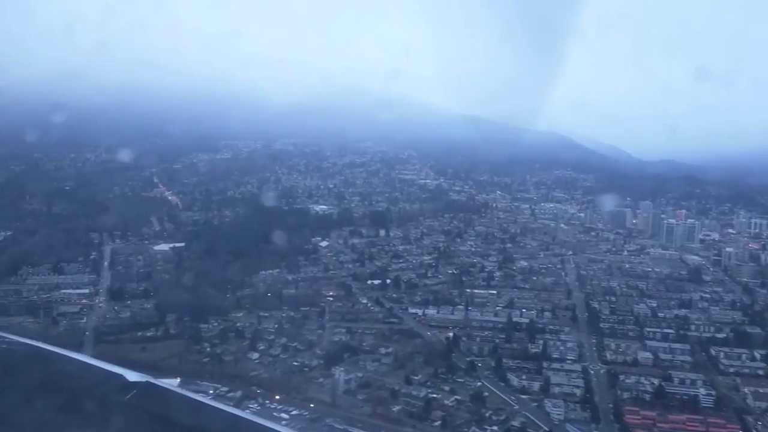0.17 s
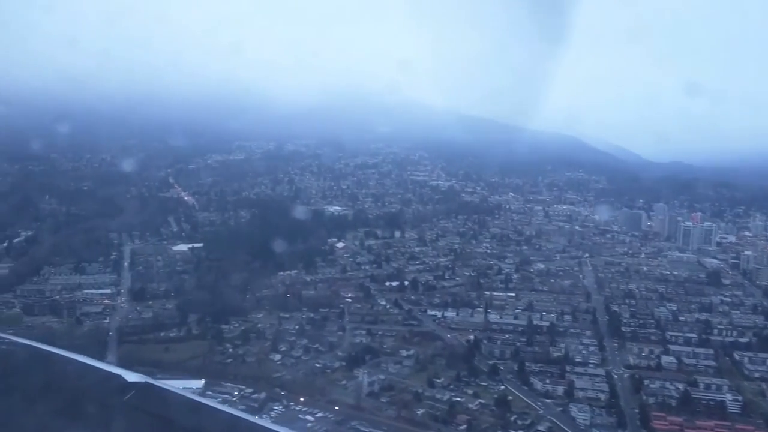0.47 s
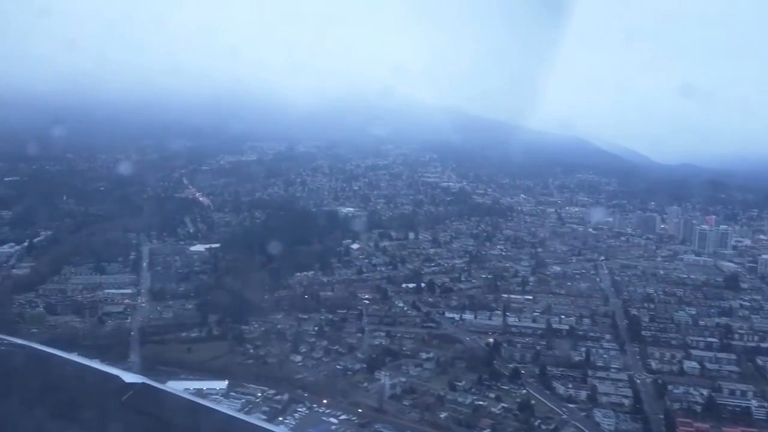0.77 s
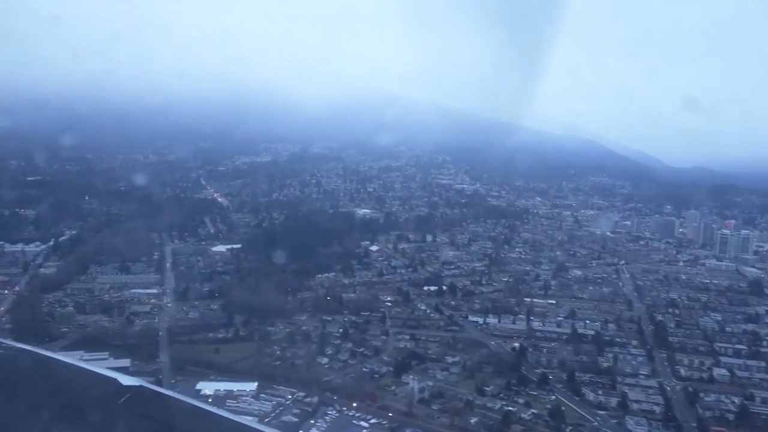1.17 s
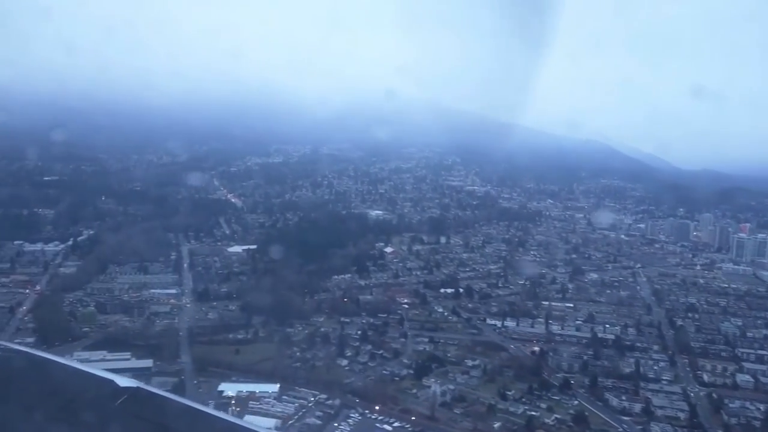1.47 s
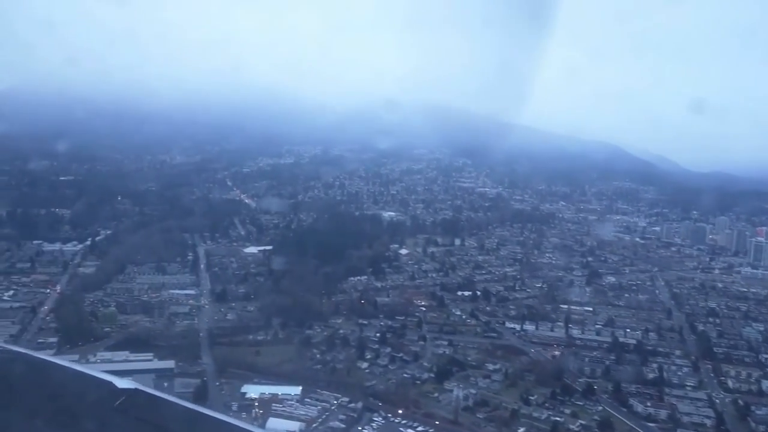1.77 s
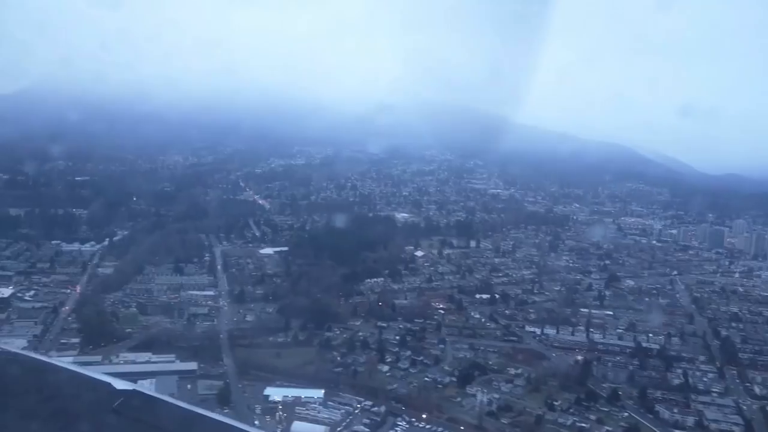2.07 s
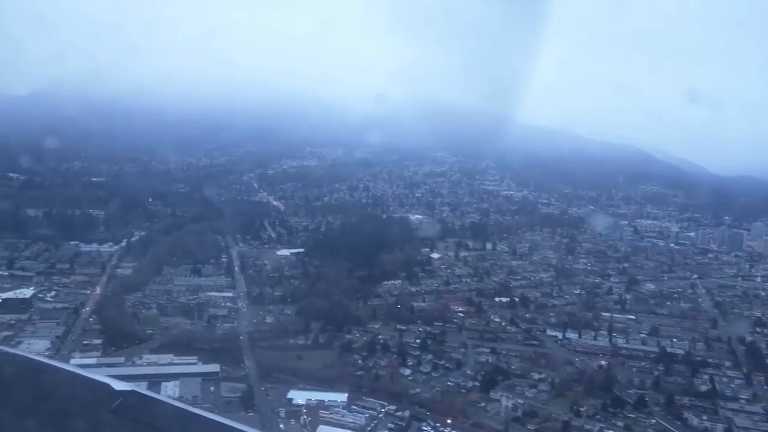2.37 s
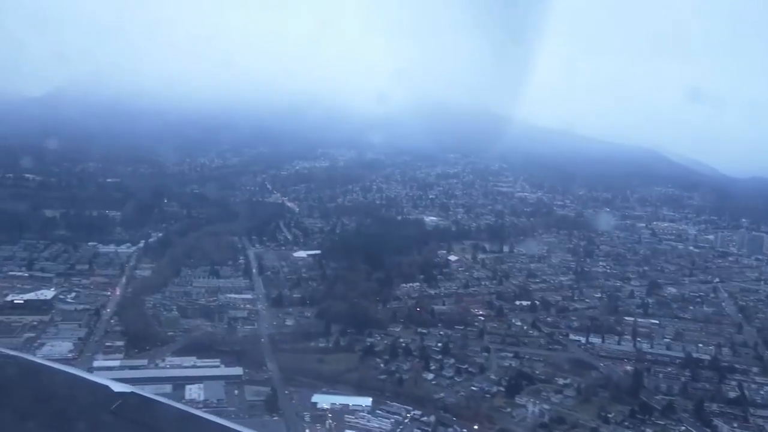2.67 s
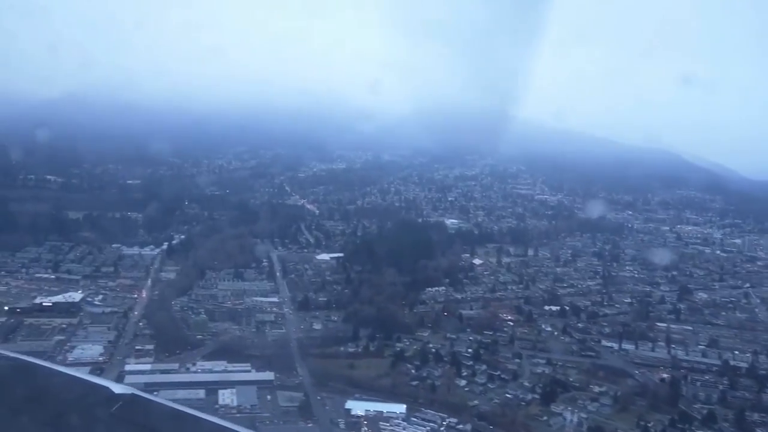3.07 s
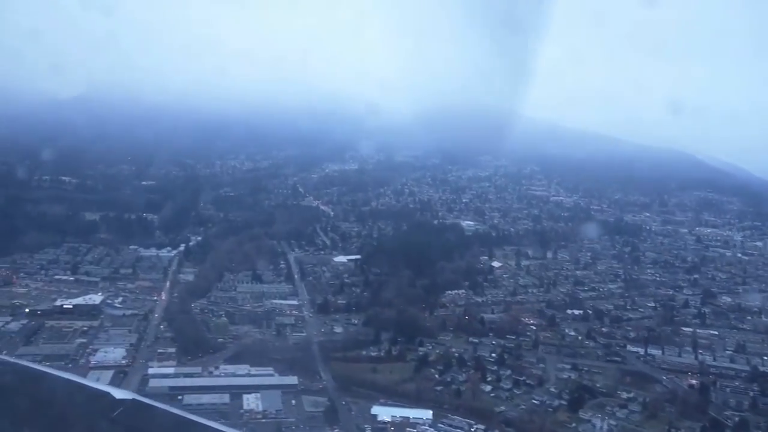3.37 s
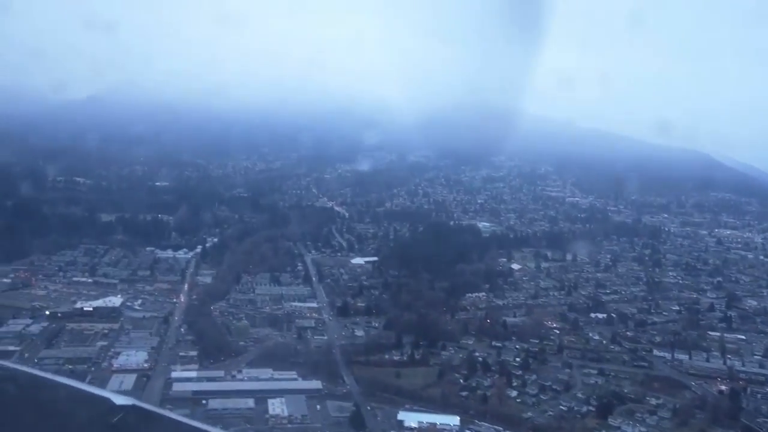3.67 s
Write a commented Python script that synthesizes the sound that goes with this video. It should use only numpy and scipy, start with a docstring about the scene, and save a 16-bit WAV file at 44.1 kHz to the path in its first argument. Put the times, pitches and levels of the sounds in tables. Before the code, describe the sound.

Deep turboprop drone hums continuously inside a small plane while the soft wind rush swells midway.

```python
"""A low drone fills the cabin of a small three-blade turboprop in cruise, under a rush of air that swells.
The drone is additive synthesis: the blade tone, its overtones and the propeller shaft orders.
The air is noise shaped by a spectrum; a gear tone and a fuzzy turbine whine sound faintly above.
The drone overloads the microphone on its downward swing at first, which flattens the troughs
and chops the hiss once a cycle."""
import sys
import numpy as np
from scipy import signal
from scipy.io import wavfile
from scipy.ndimage import uniform_filter1d

SR = 44100
rng = np.random.default_rng(int(sys.argv[2]) if len(sys.argv) > 2 else 0)


def wav_out(sig):
    """Save sig, one row per channel (or a flat mono array), as 16-bit PCM at SR to the path in sys.argv[1]."""
    wavfile.write(sys.argv[1], SR, np.round(np.clip(np.atleast_2d(sig).T, -1, 1) * 32767).astype(np.int16))


def gain_from_decibels(decibels):
    """Convert decibel values to linear amplitude factors."""
    exponent = np.asarray(decibels, float) / 20
    return 10 ** exponent


N = 168021
T = np.arange(N) / SR


def evened(x):
    """Normalization: scales a signal to unit rms."""
    return x / np.sqrt(np.mean(abs(x) ** 2) + 1e-20)


def curve(rows, col=1, at=T):
    """Linear interpolation: one column of a table at the given times."""
    rows = np.array(rows, float)
    return np.interp(at, rows[:, 0], rows[:, col])


def read(points, hz):
    """Logarithmic frequency axis: a spectrum table is interpolated along it."""
    f, value = np.transpose(points)
    return np.interp(np.log(hz + 1), np.log(f + 1), value)


def drift(hz):
    """Narrow-band modulation: complex noise of about hz bandwidth and unit rms."""
    r = np.exp(-np.pi * hz / SR)
    settle = SR  # the filter runs in for a second first
    z = rng.standard_normal(N + settle) + 1j * rng.standard_normal(N + settle)
    return evened(signal.lfilter([1], [1, -2 * r, r * r], z)[settle:])


def tone(turns, db):
    """Simple harmonic motion: a cosine of rms level db."""
    return np.sqrt(2) * gain_from_decibels(db) * np.cos(2 * np.pi * turns)


# Blade passing frequency. Each row: time in seconds, blade rate in Hz.
BLADE_RATE = [(0, 86.11), (1.8, 86.11), (2.0, 86.2), (2.4, 86.2), (2.8, 85.8), (3.1, 85.7), (3.4, 85.95),
              (3.81, 86.15)]
START_TURNS = .2  # the drone is met in mid-swing


def blade_turns():
    """Phase is the time integral of frequency: blade cycles elapsed."""
    return START_TURNS + np.cumsum(curve(BLADE_RATE)) / SR


WOBBLE_DB, WOBBLE_TURNS, WOBBLE_HZ = .08, .0012, 12  # level and phase wobble per order, bandwidth
# Blade orders 1 to 4. Each row: time in seconds, then the rms level in dB of orders 1, 2, 3 and 4.
ORDER_LEVELS = [(0, -9.5, -26.5, -39, -34), (.3, -9.5, -27, -37.5, -29), (.6, -9.5, -25, -33.5, -32),
                (.9, -10, -23.5, -34, -29.5), (1.2, -10.5, -21, -33.5, -31.5),
                (1.5, -11.5, -21, -32, -25.5), (1.75, -11, -20.5, -34.5, -38),
                (1.95, -12.5, -20.5, -41, -34), (2.08, -14, -24.5, -35, -27), (2.2, -14.5, -27.5, -25, -33),
                (2.33, -13, -21, -26, -26.5), (2.48, -12.5, -17, -39, -27), (2.7, -12.5, -17.5, -44, -26),
                (2.9, -15, -19, -31.5, -28), (3.05, -13, -22, -25.5, -31), (3.17, -11.5, -32.5, -23.5, -27),
                (3.3, -11.4, -22, -24.5, -27.5), (3.5, -11.5, -21.5, -31, -26.5),
                (3.81, -11, -21, -32, -26.5)]
# Push or pull of each order at the crest. One sign for each of orders 1 to 4.
ORDER_SIGNS = (1, -1, 1, 1)
# Drift of the orders from the blade beat across the cabin. Each row: time in seconds, then the lead
# in turns of orders 1, 2, 3 and 4.
ORDER_LEADS = [(0, 0, 0, 0, .05), (1.7, 0, 0, 0, .08), (1.9, .01, 0, 0, .2), (2.1, .04, 0, .24, .36),
               (2.3, .05, 0, -.05, .16), (2.5, .1, 0, -.12, .08), (2.75, .1, 0, -.2, .06),
               (2.9, .06, 0, -.24, .05), (3.1, 0, 0, -.08, .11), (3.3, .05, 0, .25, .38),
               (3.81, .05, 0, .29, .42)]


def blade_orders(turns):
    """Fourier series of the blade pressure: each harmonic wobbles more the higher it is."""
    out = np.zeros(N)
    for order, sign in enumerate(ORDER_SIGNS, 1):
        wobble = drift(WOBBLE_HZ) * order
        phase = order * turns + curve(ORDER_LEADS, col=order) + WOBBLE_TURNS * wobble.imag
        level = curve(ORDER_LEVELS, col=order) + WOBBLE_DB * wobble.real
        out += sign * tone(phase, level)
    return out


UPPER_LAG_S = 0.00025
# Higher blade harmonics. Each row: blade order, rms level in dB.
UPPER_ORDERS = [(5, -50.5), (6, -53), (7, -54.5)]


def upper_orders(turns):
    """Phase alignment: harmonics that crest together, half a turn and a short lag after the blade beat."""
    out = np.zeros(N)
    for order, db in UPPER_ORDERS:
        beat = turns + .5 - UPPER_LAG_S * curve(BLADE_RATE)
        out += tone(round(order) * (beat + WOBBLE_TURNS * drift(WOBBLE_HZ).imag), db)
    return out


CALM_DB = -48.5  # treble level that counts as no swell
# Strength of the airflow. Each row: time in seconds, treble level in dB.
AIR_LEVEL = [(0.05, -48.5), (0.18, -48), (0.21, -48), (0.9, -48), (1.0, -46.5), (1.01, -48.5),
             (2.13, -46.5), (2.27, -40), (2.72, -42), (3.13, -38.5), (3.77, -42.5)]


def air_swell(at=T):
    """Level difference: the treble of the airflow in dB above calm."""
    return curve(AIR_LEVEL, at=at) - CALM_DB


# Propeller shaft orders and gear mesh. Each row: order of the shaft rate, rms level in dB in calm air.
SHAFT_ORDERS = [(2, -48), (4, -46.5), (85, -69.5)]


def shaft_orders(turns):
    """Rotational orders: multiples of the shaft rate, unsteady in level, swelling with the air."""
    out = np.zeros(N)
    swell = air_swell()
    for order, db in SHAFT_ORDERS:
        unsteady = abs(1 + .5 * drift(6)) / np.sqrt(1.25)  # unit rms
        shaft_turns = turns / 3  # three blades a turn
        out += tone(round(order) * shaft_turns + rng.random(), db + swell) * unsteady
    return out


RUSH_DB, PATCH_DB, FLUTTER_DB = -32.5, 1, 0.1  # rms level in calm air, spectral patches, level flutter
# Spectrum of the rush and hull rumble. Each row: frequency in Hz, relative density in dB per Hz.
RUSH_SPECTRUM = [(12, -15), (28, -6.5), (42, -10), (56, -2.5), (80, -9.5), (115, -1.5), (150, -10),
                 (230, -7.5), (300, -8.5), (390, -9), (460, -15.5), (560, -23.5), (650, -20.5), (740, -27),
                 (830, -25), (950, -28.5), (1250, -32.5), (1450, -27), (1700, -33), (2000, -31.5),
                 (2350, -37.5), (3400, -38.5), (4400, -43), (5400, -39.5), (6900, -43.5), (7600, -38.5),
                 (8500, -39.5), (8850, -34.5), (9700, -33), (10300, -35), (11500, -37.5), (13000, -40),
                 (14500, -41), (16000, -40)]
# Narrow hiss around the whine. Each row: frequency in Hz, dB added to the rush.
HISS_RIDGE = [(8900, 0), (9060, 4.5), (9250, 5.5), (9360, 4), (9450, 1), (9700, 0)]
# Response to the swell. Each row: frequency in Hz, share of the swell followed.
SWELL_SHARE = [(30, 0.1), (150, 0.84), (600, 0.45), (1100, 0.47), (1500, 0.67), (9000, 0.7)]


def airflow():
    """Filtered noise: random short-time spectra, shaped and patchy, give the rush of air and hull rumble."""
    size, hop = 2048, 512
    frames, hz = N // hop + 5, np.fft.rfftfreq(size, 1 / SR)
    real, imag, patches = rng.standard_normal((frames, len(hz), 3)).T
    patches = uniform_filter1d(patches, size=16, axis=0)  # across frequency
    patches = evened(uniform_filter1d(patches, size=6, axis=1))  # across time
    shape = read(RUSH_SPECTRUM, hz) + read(HISS_RIDGE, hz)
    calm = (real + 1j * imag) * gain_from_decibels(shape[:, None] + PATCH_DB * patches)
    swell = air_swell(np.arange(frames) * hop / SR)
    swollen = calm * gain_from_decibels(read(SWELL_SHARE, hz)[:, None] * swell)
    calm_sound = signal.istft(calm, nperseg=size, noverlap=size - hop)[1]
    rush = signal.istft(swollen, nperseg=size, noverlap=size - hop)[1][:N]
    calm_rms = np.sqrt(np.mean(calm_sound ** 2))
    return gain_from_decibels(RUSH_DB + FLUTTER_DB * drift(36).real) * rush / calm_rms


WHINE_WIDTH_HZ, WHINE_FUZZ = 10, .35  # bandwidth and relative amplitude of the fuzz
# Turbine whine. Each row: time in seconds, whine frequency in Hz, then the rms level in dB before the
# fuzz of the whine, of the sideband one blade rate above and of the sideband one blade rate below.
WHINE = [(0, 9180, -74, -59, -76), (1.0, 9180, -72, -60, -76), (1.2, 9178, -70, -67, -76),
         (1.75, 9168, -68, -62, -74), (2.0, 9125, -62, -70, -64), (2.3, 9098, -57, -68, -63),
         (2.7, 9122, -60, -72, -68), (3.1, 9135, -59, -66, -57), (3.35, 9142, -68, -57, -57),
         (3.6, 9147, -72, -57, -59), (3.81, 9152, -72, -56, -66)]


def turbine(turns):
    """Modulation sidebands: a fuzzy whine with a line either side at the blade rate."""
    out = np.zeros(N)
    spin = np.exp(2j * np.pi * np.cumsum(curve(WHINE)) / SR)
    for col, side in ((2, 0), (3, 1), (4, -1)):
        line = spin * np.exp(2j * np.pi * side * turns)
        fuzz = 1 + WHINE_FUZZ * drift(WHINE_WIDTH_HZ)
        out += np.sqrt(2) * gain_from_decibels(curve(WHINE, col=col)) * (line * fuzz).real
    return out


def scene():
    """Superposition: all the cabin sounds add, sharing one blade phase."""
    turns = blade_turns()
    propeller = blade_orders(turns) + upper_orders(turns) + shaft_orders(turns)
    return (propeller + airflow() + turbine(turns))[None]


KNEE = .001  # softness of the floor, in amplitude
STICK, RECOVERY_S = 1.2, .0004  # how much of the overload lingers, and for how long
SELF_NOISE_DB = -62
# Overload floor of the microphone. Each row: time in seconds, deepest downward swing in dB.
TROUGH = [(0, -6.6), (1.0, -6.6), (1.6, -6.9), (2.0, -7.1), (2.1, -3.5), (3.81, -3.5)]


def microphone(dry):
    """Asymmetric clipping: the downward swing meets a tight-kneed floor and sticks briefly; hiss is added."""
    floor = -gain_from_decibels(curve(TROUGH))
    q = np.exp(-1 / (RECOVERY_S * SR))
    overload = np.maximum(floor - dry, 0)
    lingering = STICK * signal.lfilter([1 - q], [1, -q], overload)
    held = floor + KNEE * np.logaddexp(0, (dry - lingering - floor) / KNEE)
    return held + gain_from_decibels(SELF_NOISE_DB) * rng.standard_normal(N)


COUPLING_HZ, EDGE_HZ, OFFSET = 4, 15740, .006  # high-pass corner, low-pass edge, constant added


def band_limit(x):
    """Linear filtering: a coupling capacitor blocks the lows, a steep low-pass the top; a small offset."""
    r = np.exp(-2 * np.pi * COUPLING_HZ / SR)
    coupled = signal.lfilter([1, -1], [1, -r], x)
    edge = signal.firwin(1023, EDGE_HZ, window=("kaiser", 10), fs=SR)[None]
    return signal.oaconvolve(coupled, edge, "same") + OFFSET


def top_cut(x):
    """Nothing passes above the cut-off."""
    return signal.sosfilt(signal.butter(12, 16980, fs=SR, output="sos"), x)


def record(dry):
    """Signal chain: the overloaded microphone, then the band limit."""
    mix = band_limit(microphone(dry))
    return top_cut(mix)


dry = scene()
out = record(dry)
wav_out(out)
```